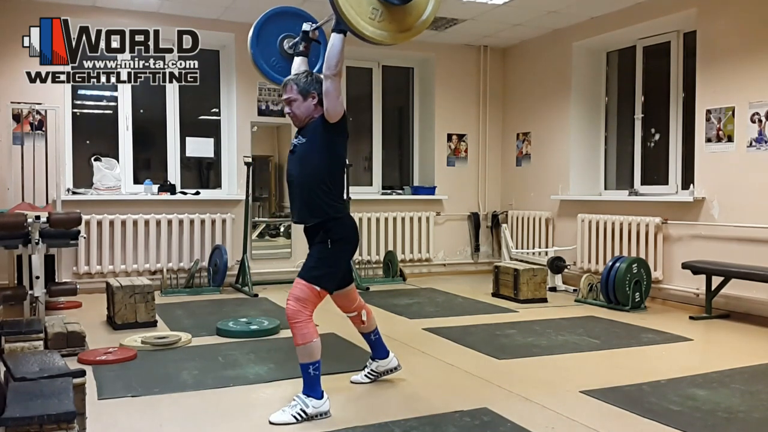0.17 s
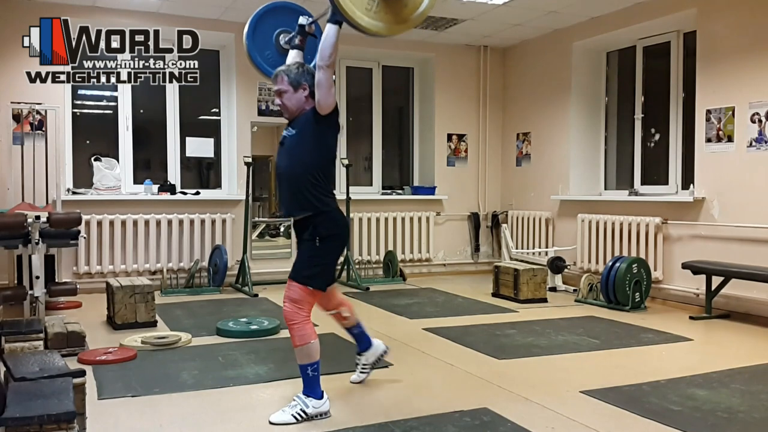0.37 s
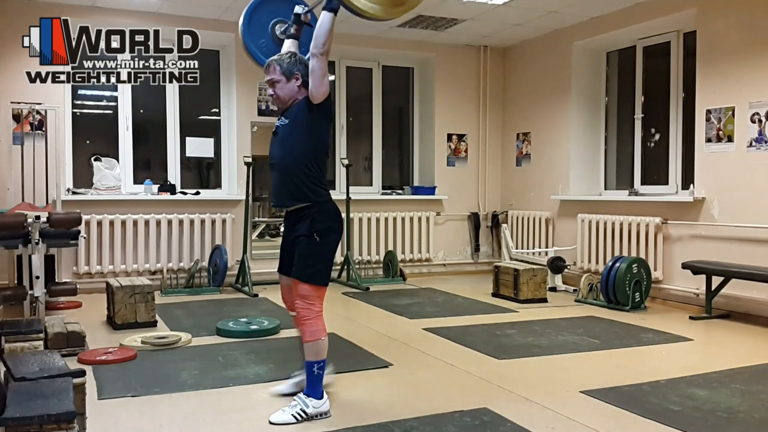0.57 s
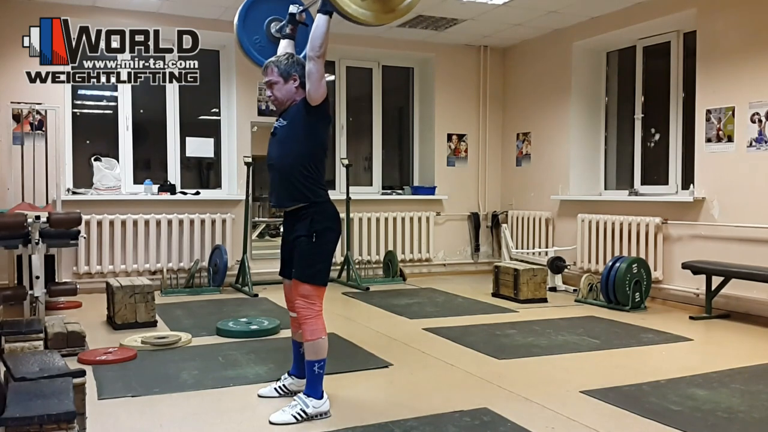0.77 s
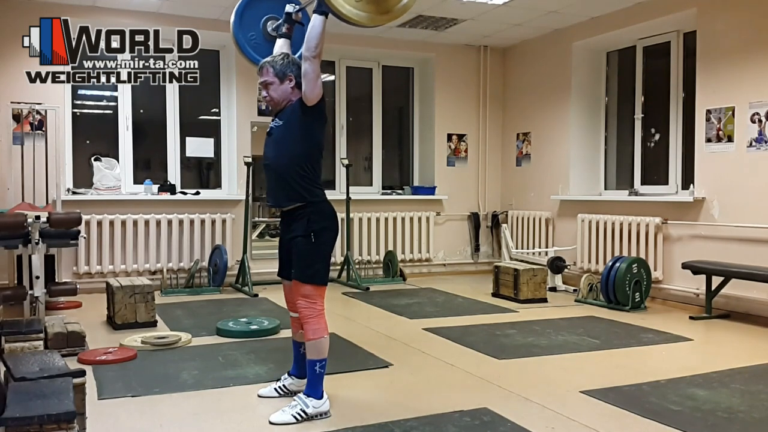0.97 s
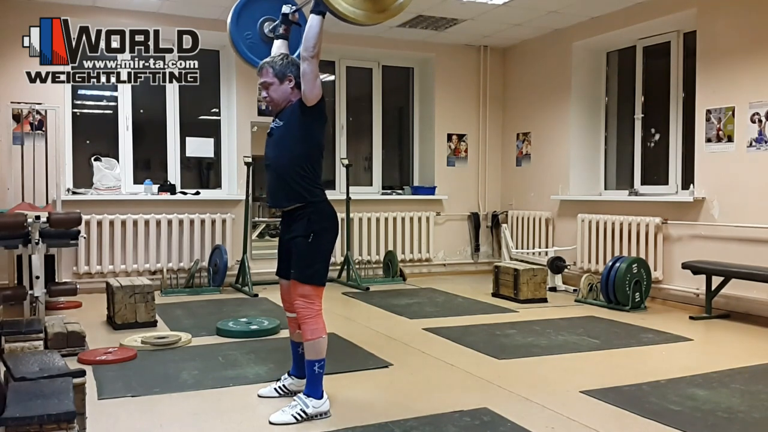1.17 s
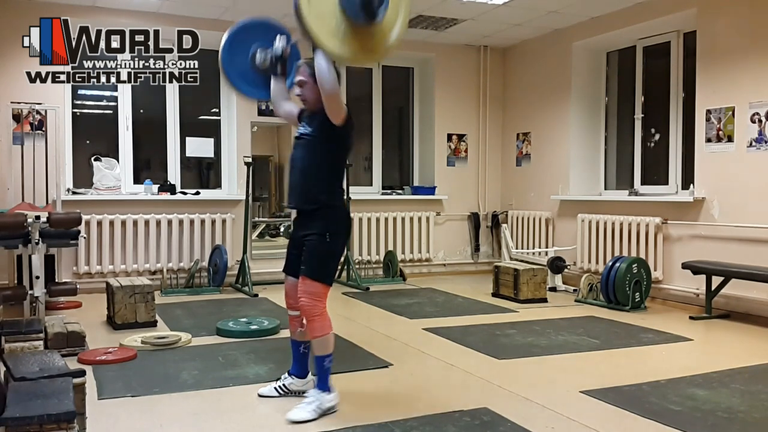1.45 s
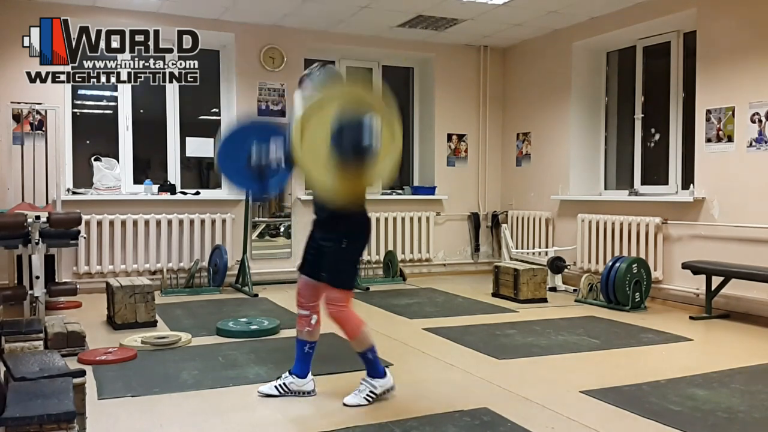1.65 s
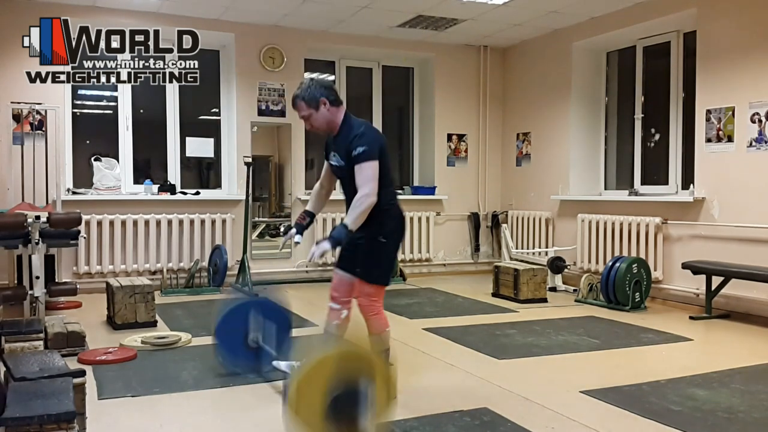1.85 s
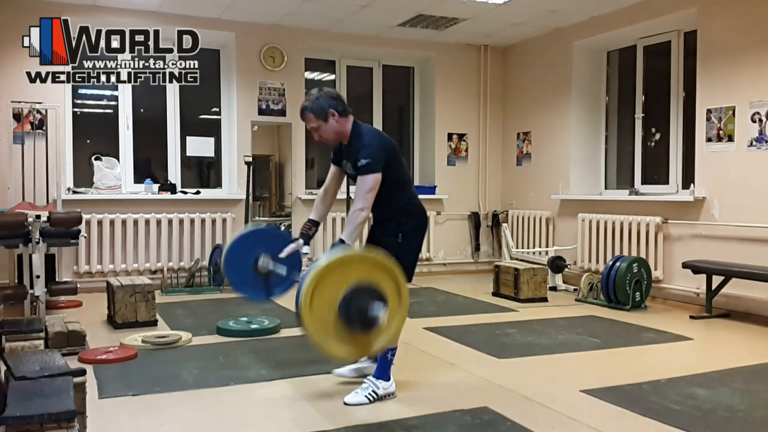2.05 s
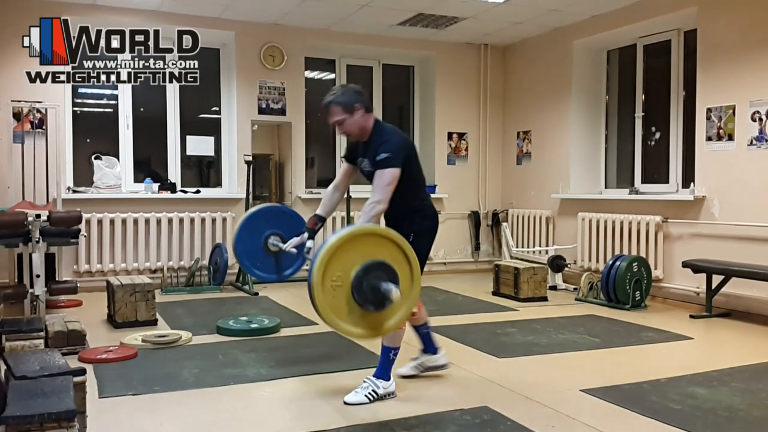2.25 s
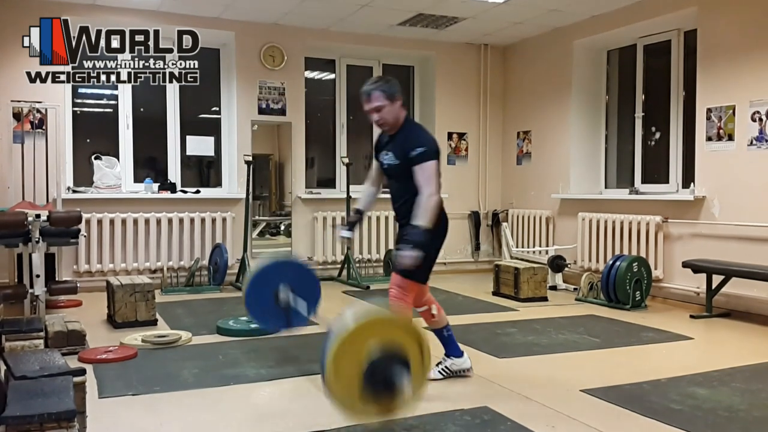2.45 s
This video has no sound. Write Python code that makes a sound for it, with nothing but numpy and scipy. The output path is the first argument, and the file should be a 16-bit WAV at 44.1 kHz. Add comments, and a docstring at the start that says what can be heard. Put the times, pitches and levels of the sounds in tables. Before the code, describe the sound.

A loaded barbell drop dominates. Low room noise and faint hiss open, with tiny foot movements and a distinct double shoe knock on boards around 0.7 s. Soft scuffs and faint metal chinks come at 1.5-1.9 s. At about 1.97 s the barbell crashes: clustered thuds, rattling plates, ringing bar and floor boom until 2.26 s, then chinking sleeves and a weak last knock near 2.5 s, echoing in a hard gym.

```python
"""A loaded barbell crashes onto the platform of a hard-walled gym, heard mostly from the right.
Its rubber plates thud and rattle on their sleeves, the steel bar rings and the sleeves chink as it bounces.
The floor booms under the load; before the drop, the weightlifter's shoes step together on the boards.
Contacts are bursts of coloured noise, ringing parts are sums of struck modes, and the gym answers both.
Low room noise and a faint hiss lie behind it all."""
import sys
import numpy as np
from scipy import signal
from scipy.fft import rfft, irfft, next_fast_len
from scipy.io import wavfile
from scipy.ndimage import map_coordinates

SR = 44100
rng = np.random.default_rng(int(sys.argv[2]) if len(sys.argv) > 2 else 0)


def digitize_waveform(pressure):
    """Quantize a signal to 16-bit integers and store it at the path in sys.argv[1].

    Rows of a 2-D input are taken as channels; values are limited to [-1, 1].
    """
    field = np.atleast_2d(pressure).T
    bounded = np.clip(field, -1, 1)
    quanta = np.round(bounded * 32767).astype(np.int16)
    wavfile.write(sys.argv[1], SR, quanta)


N = 114660  # samples in the scene
T = np.arange(SR) / SR  # the one second given to each event [s]

# likeness of the two microphones, close in the bass and loose in the treble: freq_hz, correlation (-1 to 1)
LIKENESS = [(60, 0.93), (150, 0.94), (350, 0.67), (700, 0.57), (1500, 0.27), (5000, 0.0083)]


def amp(db):
    """Turn decibels into gain."""
    return 10 ** (np.asarray(db) / 20)


def unit(x):
    """Scale to rms 1."""
    return x / np.sqrt(np.mean(x ** 2) + 1e-20)


def along(points, hz):
    """Read a curve of (Hz, value) points on a log frequency axis."""
    point_hz, values = np.transpose(points)
    return np.interp(np.log(hz + 1), np.log(point_hz + 1), values)


def wobble(rate, size):
    """A smooth random curve with rate knots a second."""
    knots = rng.standard_normal(4096)
    return map_coordinates(knots, [np.arange(size) * rate / SR], mode="wrap")


def ears(hz):
    """Left and right gain: half the level difference goes to each side."""
    # lean of the sound between the microphones: freq_hz, left_minus_right_db
    side = [(50, 0), (130, -3), (350, -6.5), (700, -6.5), (1400, -9.5), (4500, -12), (8000, -7), (13000, 1)]
    return amp(np.multiply.outer([.5, -.5], along(side, hz)))


def noise(colour, size):
    """Coloured stereo noise: a shared and an opposed part set how alike the microphones are."""
    hz = np.fft.rfftfreq(size, 1 / SR)
    turn = np.arccos(np.clip(along(LIKENESS, hz), -1, 1)) / 2
    white = rfft(rng.standard_normal((2, size)))
    shared, opposed = white * [np.cos(turn), np.sin(turn)]
    stereo = np.array([shared + opposed, shared - opposed])
    # cut below half the first colour point, roll off around twice the last
    fade = (hz > colour[0][0] / 2) / (1 + (hz / (2 * colour[-1][0])) ** 4)
    return unit(irfft(stereo * amp(along(colour, hz)) * fade * ears(hz), size))


def burst(colour, attack_s, direct_s, room_db, rough_db=0, rough_rate=1):
    """One contact: direct noise falling 60 dB in direct_s, and the gym's answer decaying by frequency."""
    # reverberation of the gym: freq_hz, t60_s
    room = [(50, 1.85), (250, 0.69), (1000, 0.76), (3000, 0.76), (6000, 0.81), (15000, 0.45)]
    decay_db = -60 * T / direct_s
    direct = noise(colour, SR) * amp(decay_db + rough_db * wobble(rough_rate, size=SR))
    hz, t, bands = signal.stft(noise(colour, SR), SR, nperseg=512)
    bands = bands * amp(-60 * t / along(room, hz)[:, None])
    tail = signal.istft(bands, SR)[1][:, :SR]
    return (direct + amp(room_db) * tail) * (1 - np.exp(-T / attack_s))


def ring(modes, attack_s, direct_s, tail_db, t60, blur_hz):
    """Struck modes of alternating sign: a clean tone, then a ring that reflections blur at each microphone."""
    out = np.zeros((2, SR))
    knots = np.arange(256)
    direct = amp(-60 * T / direct_s)
    tail = amp(tail_db - 60 * T / t60) * (1 - direct)
    for k, (hz, db) in enumerate(modes):
        # complex drifts: one shared by both microphones, one for each alone
        drift = rng.standard_normal((3, len(knots), 2)) @ [1, 1j]
        alike = np.clip(along(LIKENESS, hz), 0, 1)
        mixed = np.sqrt(alike) * drift[0] + np.sqrt(1 - alike) * drift[1:]
        sway = np.array([np.interp(T * blur_hz, knots, curve) for curve in mixed])
        tone = (np.exp(2j * np.pi * hz * T) * (direct + tail * sway)).imag
        out += (-1) ** k * amp(db) * ears(hz)[:, None] * tone
    mode_gain = np.linalg.norm(amp([db for hz, db in modes]))
    return out * (1 - np.exp(-T / attack_s)) / mode_gain


def add(track, s, sound):
    """Mix a sound in at time s, in seconds."""
    i = max(0, round(s * SR))
    track[:, i:i + SR] += sound[:, :N - i]


def resonant(x, depth_db, spacing_hz):
    """Pass a sound through a dense, irregular set of fixed resonances, with minimum phase."""
    size = next_fast_len(N + SR)
    hz = np.fft.rfftfreq(size, 1 / SR)
    db = depth_db * map_coordinates(rng.standard_normal(SR), [hz / spacing_hz], mode="wrap")
    # folding the cepstrum forward in time gives the minimum phase
    cepstrum = irfft(np.log(unit(amp(db))), size)
    cepstrum[1:size // 2] *= 2
    cepstrum[size // 2:] = 0
    return irfft(rfft(x, size) * np.exp(rfft(cepstrum)), size)[:, :N]


def crash():
    """Blows thud the plates, rattle their steel hubs on the sleeves and ring the bar; two plates clack once."""
    # plates hitting the platform and each other: start_s, thud_db, plate_ring_db, clatter_db, bar_ring_db
    blows = [(1.9683, -10, -25, -18, -35.5), (1.996, -10, -11.5, -18.5, -34),
             (2.025, -13.5, -18.5, -22, -31), (2.064, -25.5, -14, -22, -39),
             (2.095, -17.5, -15.5, -25, -31.5), (2.138, -24, -13.5, -25, -31),
             (2.167, -40, -52, -25, -35.5), (2.193, -21.5, -22.5, -27.5, -38),
             (2.26, -26.5, -24.5, -34, -51), (2.514, -40, -37, -40, -81)]
    # modes of the plates on the platform: freq_hz, relative_level_db
    plate_modes = [(112, -11.5), (156, -9), (213, -4), (251, 0), (291, -0.5), (308, -5), (372, -17.5),
                   (413, -16.5), (566, -18.5)]
    # level curve of the bar's bending modes: freq_hz, relative_level_db
    bar_levels = [(1000, 1.5), (3800, 2), (4600, 7.5), (5400, 3), (6500, 0), (9100, -9), (10500, -21.5),
                  (15000, -11)]
    # colours of the thud, the hubs' clatter, the bar's sizzle and the clack: freq_hz, relative_density_db
    thud_colour = [(30, -23), (80, -12), (170, -4.5), (380, -2), (520, -14), (900, -19), (2000, -71)]
    clatter_colour = [(200, -50), (550, 1.5), (1000, -0.5), (1800, 4), (2400, 0), (3200, -5.5), (4600, -6),
                      (5600, -15.5), (8500, -75)]
    sizzle_colour = [(3000, -11), (6000, 4), (8500, -2), (11000, 0.5), (15200, -2.5)]
    clack_colour = [(2200, -17), (3500, 1), (4300, 2.5), (5500, -17.5)]

    out, rattle = np.zeros((2, 2, N))
    # stretched series: bending mode n lies at 60.13 Hz * n ** 1.56
    bending_hz = 60.13 * np.arange(6, 36) ** 1.56
    bending = [(hz, along(bar_levels, hz)) for hz in bending_hz]
    for s, thud_db, plate_db, clatter_db, ring_db in blows:
        thud = burst(thud_colour, attack_s=0.0006, direct_s=0.07, room_db=-14)
        plates = ring(plate_modes, attack_s=0.0014, direct_s=0.31, tail_db=-9.5, t60=0.72, blur_hz=8.86)
        sizzle = amp(-7) * burst(sizzle_colour, attack_s=0.002, direct_s=0.33, room_db=-2,
                                 rough_db=2.5, rough_rate=400)
        bar = ring(bending, attack_s=0.001, direct_s=0.046, tail_db=-3, t60=.98, blur_hz=20)
        clatter = burst(clatter_colour, attack_s=0.0003, direct_s=.11, room_db=-2,
                        rough_db=4.8, rough_rate=650)
        add(out, s, amp(thud_db) * thud + amp(plate_db) * plates + amp(ring_db) * (bar + sizzle))
        add(rattle, s, amp(clatter_db) * clatter)
    clack = burst(clack_colour, attack_s=0.0011, direct_s=0.081, room_db=-8.5)
    add(rattle, 2.0645, amp(-18.5) * clack)
    return out + resonant(rattle, depth_db=2.7, spacing_hz=30)


def sleeves():
    """Loose sleeves knock their stops as the bar turns, falls and bounces; each knock favours other modes."""
    # sleeves chinking on the bar: start_s, level_db
    chinks = [(1.535, -50), (1.79, -49.5), (1.9017, -43), (1.981, -21.5), (2.019, -33), (2.13, -21.5),
              (2.294, -27.5), (2.339, -35), (2.453, -40), (2.479, -34.5), (2.517, -38.5), (2.571, -35.5)]
    # modes of the sleeves, before each knock's own variation: freq_hz, relative_level_db
    sleeve_modes = [(1604, -1), (1724, -4.5), (1780, 2), (1830, 0.5), (1940, -8.5), (2587, -12)]
    out = np.zeros((2, N))
    for s, db in chinks:
        modes = [(hz, level + 3.5 * rng.standard_normal()) for hz, level in sleeve_modes]
        chink = ring(modes, attack_s=0.0002, direct_s=0.14, tail_db=-7, t60=0.55, blur_hz=70)
        add(out, s, amp(db) * chink)
    return out


def floor():
    """The floor booms under each change of load: a slow burst of deep noise."""
    # weight shifting on the floor: start_s, level_db
    pushes = [(0.0, -45), (0.759, -49), (1.772, -54), (1.976, -27), (2.086, -24), (2.384, -37.5)]
    # colour of the floor's boom: freq_hz, relative_density_db
    boom_colour = [(20, -14), (45, -6), (63, 1), (78, -19.5), (100, -10.5), (160, -27.5)]
    out = np.zeros((2, N))
    for s, db in pushes:
        boom = burst(boom_colour, attack_s=0.0041, direct_s=0.56, room_db=-1)
        add(out, s, amp(db) * boom)
    return out


def feet():
    """Each step knocks the boards into their modes, thumps and scuffs."""
    # shoes on the platform: start_s, knock_and_thump_db, scuff_db
    steps = [(0.0, -44, -55.5), (.205, -59.5, -91), (0.625, -47.5, -61), (0.656, -49, -70),
             (0.703, -40, -52), (0.7141, -25, -48), (.731, -26.5, -44.5), (.767, -29.5, -55.5),
             (1.507, -38, -51), (1.53, -42, -48), (1.556, -47, -50.5), (1.678, -43.5, -57.5),
             (1.722, -45.5, -61), (1.79, -54, -43)]
    # modes of the boards under a heel: freq_hz, relative_level_db
    board_modes = [(158, -3.5), (250, -1.5), (370, -3.5), (460, -4)]
    # colours of the shoe's thump and scuff: freq_hz, relative_density_db
    thump_colour = [(40, -28), (115, -20.5), (160, 2), (210, -0.5), (420, -3.5), (700, -14), (3000, -78)]
    scuff_colour = [(200, -34), (600, 8), (1200, 6.5), (2400, -1), (3300, -17.5), (5000, -13), (8000, -59)]
    out = np.zeros((2, N))
    for s, thump_db, scuff_db in steps:
        knock = amp(7) * ring(board_modes, attack_s=0.0006, direct_s=0.035, tail_db=-15.5,
                              t60=0.5, blur_hz=23.6)
        thump = amp(-4) * burst(thump_colour, attack_s=0.001, direct_s=0.06, room_db=-5)
        scuff = burst(scuff_colour, attack_s=0.00067, direct_s=0.057, room_db=-6,
                      rough_db=6, rough_rate=1070)
        add(out, s, amp(thump_db) * (knock + thump) + amp(scuff_db) * scuff)
    return out


def background():
    """Low room noise, a steady narrow hiss and a broad hiss that slowly swells and sinks."""
    # colours of the room noise, the narrow hiss and the broad hiss: freq_hz, relative_density_db
    hum_colour = [(25, 2), (48, -2), (90, -9), (160, -6.5), (280, -15.5), (700, -21), (3000, -58)]
    narrow_colour = [(3400, -19.5), (4300, 2.5), (5200, -10.5), (6300, -33)]
    broad_colour = [(500, 0), (1400, 1), (2700, -1.5), (3500, -5), (4700, 0), (6200, -13), (8500, -26),
                    (15500, -10.5)]
    # course of the broad hiss: time_s, level_db
    hiss_level = [(0, -70), (.44, -82), (.68, -70), (.97, -60.5), (1.28, -61), (1.68, -66), (1.9, -61)]
    hiss_db = np.interp(np.arange(N) / SR, *np.transpose(hiss_level))
    hum = amp(-57.5) * noise(hum_colour, N)
    narrow_hiss = amp(-69) * noise(narrow_colour, N)
    broad_hiss = amp(hiss_db) * noise(broad_colour, N)
    return hum + narrow_hiss + broad_hiss


def scene():
    """Everything heard in the gym."""
    return crash() + sleeves() + floor() + feet() + background()


def record(dry):
    """Round off the highest peaks towards 0.95, then cut steeply above the 15.8 kHz band limit."""
    soft = dry / (1 + np.abs(dry / .95) ** 6) ** (1 / 6)
    band_limit = signal.ellip(10, .1, 90, 15800, fs=SR, output="sos")
    return signal.sosfilt(band_limit, soft)


dry = scene()
out = record(dry)
digitize_waveform(out)
```